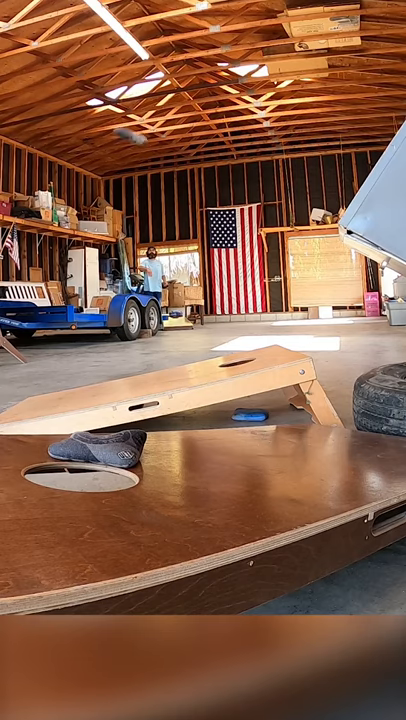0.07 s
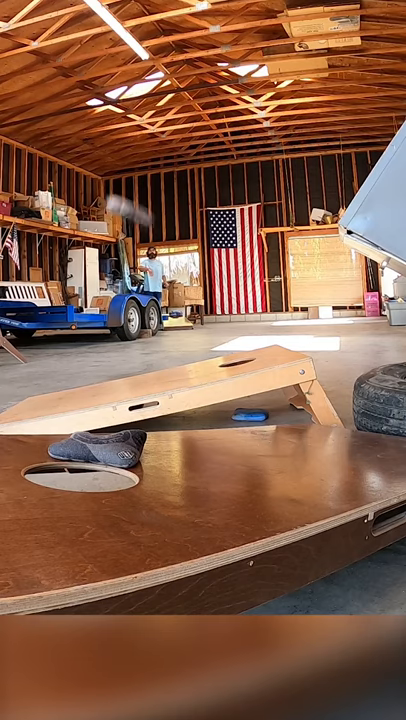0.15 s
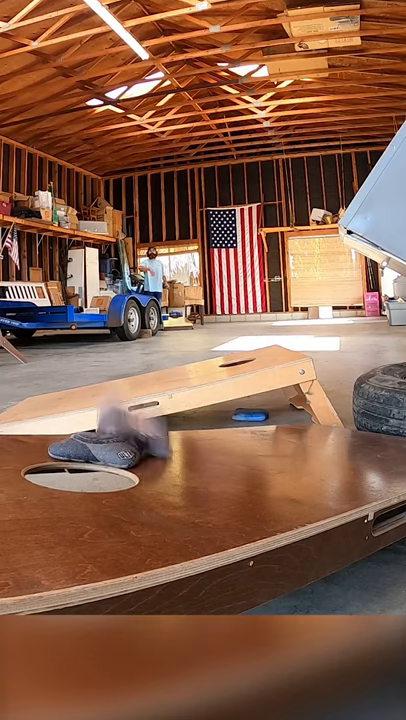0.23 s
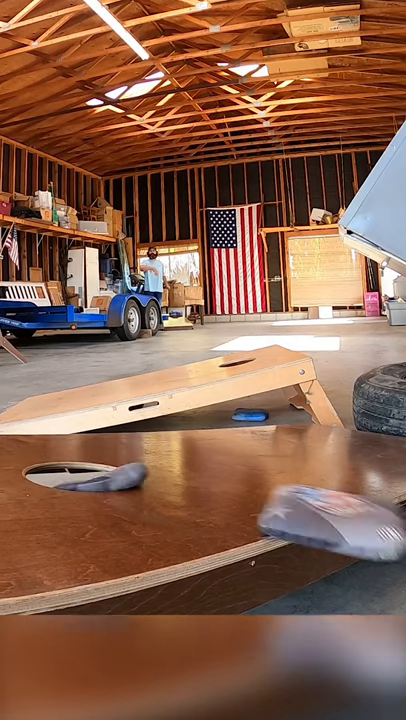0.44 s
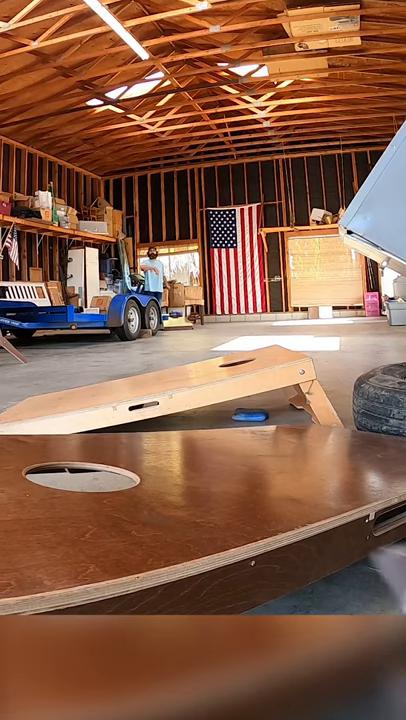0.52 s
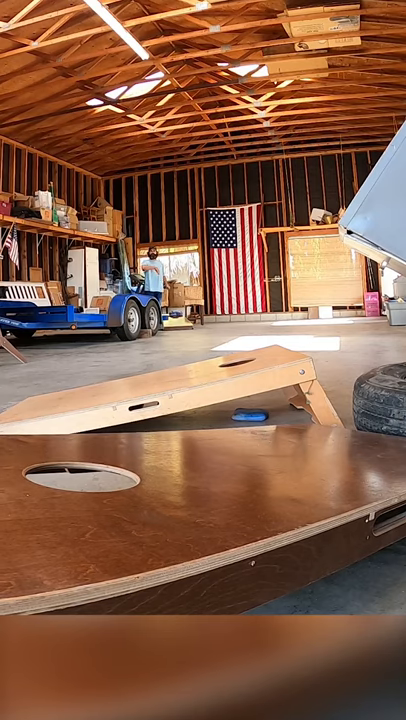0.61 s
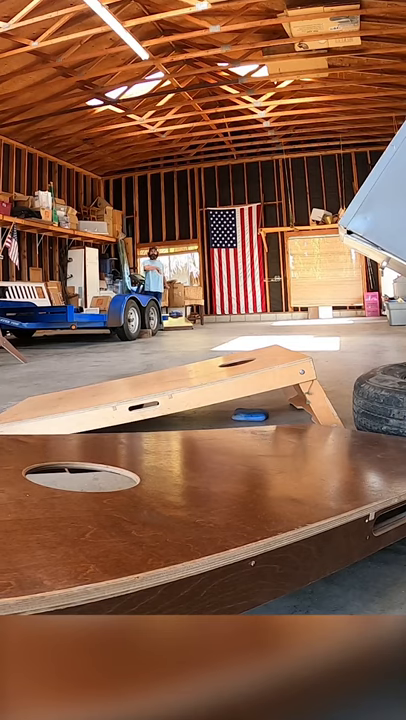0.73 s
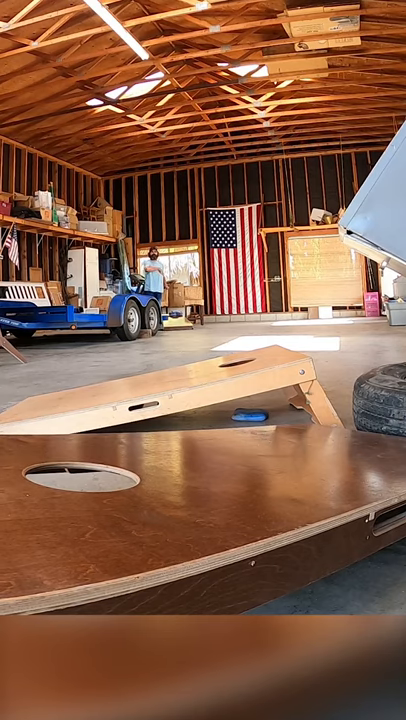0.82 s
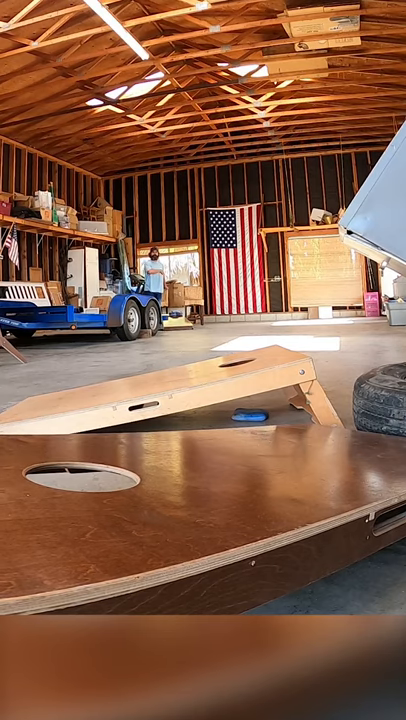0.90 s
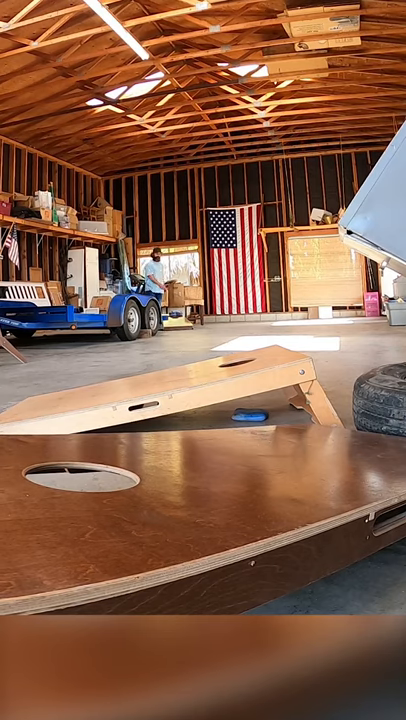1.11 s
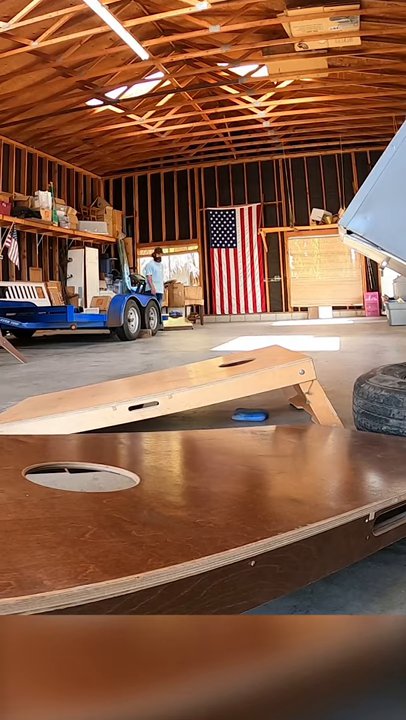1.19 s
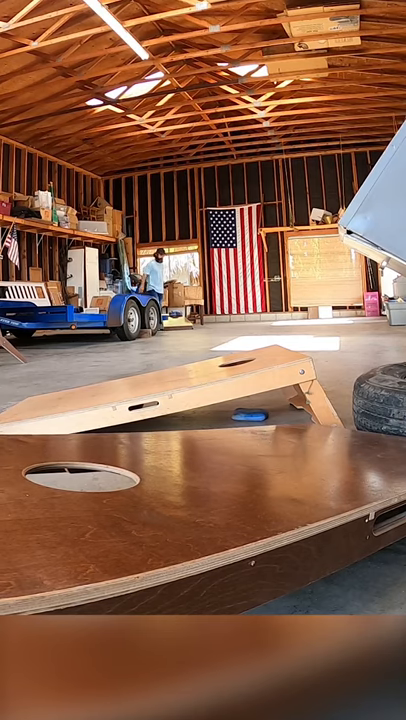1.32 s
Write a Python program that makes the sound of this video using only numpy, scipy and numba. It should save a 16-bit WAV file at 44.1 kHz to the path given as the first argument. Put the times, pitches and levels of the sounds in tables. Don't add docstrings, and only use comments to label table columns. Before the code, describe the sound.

A pellet-filled bag slaps a hollow plywood board right beside the microphone; the frame bounces and shudders, cloth scrapes along the varnish, then lighter bag drops knock at right. Large garage echo, faint bird and distant road.

```python
import sys
import numpy as np
from scipy import signal
from scipy.fft import rfft, irfft
from scipy.io import wavfile
from scipy.ndimage import uniform_filter1d
from numba import njit

SR = 44100
rng = np.random.default_rng(int(sys.argv[2]) if len(sys.argv) > 2 else 0)


def boost(x):
    u = np.asarray(x, float) / 20
    return 10 ** u


def transcribe(signal):
    frames = np.atleast_2d(signal).T
    limited = np.clip(frames, -1, 1)
    pcm = np.round(limited * 32767).astype(np.int16)
    wavfile.write(sys.argv[1], SR, pcm)


N = 59535
T = np.arange(N) / SR


def level(x, db):
    return x * boost(db) / np.sqrt(np.mean(x ** 2))


def on_log(hz, table):
    a = np.array(table, float)
    return np.interp(np.log(np.maximum(hz, 1)), np.log(a[:, 0]), a[:, 1])


def colour(x, table):
    log_gain = on_log(np.fft.rfftfreq(4096, 1 / SR), table) * np.log(10) / 20
    cepstrum = irfft(log_gain)
    cepstrum[1:2048] *= 2
    cepstrum[2049:] = 0
    impulse = irfft(np.exp(rfft(cepstrum)))
    return signal.fftconvolve(x, impulse[None], axes=1)[:, :N]


def ring(x, hz, t60):
    pole = np.exp((2j * np.pi * hz - np.log(1000) / t60) / SR)
    return signal.lfilter([1], [1, -pole], x).imag


def push(start, ms):
    u = np.clip((T - start) * 1000 / ms, 0, 1)
    force = np.sin(np.pi * u) ** 2
    return force / (force.sum() + 1e-9)


def high_pass(x, hz, order=1):
    return signal.lfilter(*signal.butter(order, hz, "high", fs=SR), x)


def pair(mid, side):
    s = high_pass(side, 2500)
    return np.array([mid + s, mid - s])


def walk(rate):
    k = int(SR / rate)
    steps = np.repeat(rng.standard_normal(N // k + 1), k)
    return 0.85 * uniform_filter1d(uniform_filter1d(steps, k), k)[:N]


def grains(rate, scatter_db):
    u = rng.random((3, N))
    size = boost(-scatter_db * np.log(1 - u[2]))
    return level((u[0] < rate / SR) * np.sign(u[1] - .5) * size, 0)


def struck(hits, modes, shake):
    chance = rng.standard_normal((len(hits), len(modes)))
    forces = [boost(db) * push(start, ms) for start, db, ms in hits]
    out = 0
    for k, (hz, db, t60) in enumerate(modes):
        sign = -1 if hz > 450 and k % 2 else 1
        force = shake[k] + boost(3.1 * chance[:, k]) @ forces
        out = out + sign * boost(db - 7) * ring(force, hz, t60)
    return out


# start in seconds, level in dB, contact in ms.
BLOWS = [
    (0.237, -34, 0.65),
    (0.2469, -21.5, 1.1),
    (0.2501, 2.5, 2.47),
    (0.256, -0.5, 0.27),
    (.264, 0.5, 4.1),
    (0.285, 1, 1.6),
]
# frequency in Hz, level in dB, t60 in seconds.
FACE_MODES = [(55.8, -23.5, 0.055), (88, -11.5, .1), (136.1, -2.5, 0.07), (164, -0.5, 0.049),
              (188.5, -13.5, 0.058), (400, -12.5, 0.089), (500, -21, 0.027), (916.6, 0.5, 0.041),
              (1110, -6.5, 0.05)]


def face():
    return struck(BLOWS, FACE_MODES, np.zeros(len(FACE_MODES)))


# start in seconds, level in dB, contact in ms.
BOUNCES = [
    (.2995, -6.5, 0.2),
    (.3015, -5, .4),
    (.3045, 3, 1),
    (.312, -7.5, 4.5),
    (.327, -13, 3.9),
    (.365, -32.5, 1.9),
    (.39, -8.5, 3),
]
# frequency in Hz, level in dB, t60 in seconds.
FRAME_MODES = [(60, -11.5, 0.11), (151.4, 0, 0.16), (253, 2, 0.1), (343.4, -3, 0.064), (394, -3.5, .1),
               (498.6, -4, .07), (526, -8, 0.072), (614, -10, 0.03), (683.7, -13, 0.23), (810, -7.5, 0.037),
               (1000, -2.5, 0.015), (1210, -6.5, 0.016), (1580, -8, 0.026), (1950, -22.5, 0.018)]


def frame():
    start_s, start_db, t60_s = .31, -33.5, 0.53
    fade = (T > start_s) * boost(start_db - 60 * (T - start_s) / t60_s)
    shudder = rng.standard_normal((len(FRAME_MODES), N)) * fade
    return struck(BOUNCES, FRAME_MODES, shudder)


def board():
    return high_pass(face() + frame(), 55, order=2)


# peak in seconds, level in dB, rise in ms, fall in ms, centre frequency in Hz.
SLAPS = [(.228, -42, .7, 6.1, 2800), (0.2396, -28.5, 0.62, 3.5, 2800), (.249, -8, 1.68, 4.2, 2500),
         (0.259, -11, 2.4, 4.5, 2500), (0.3025, -12, 1.3, 2, 1300), (.380, -33, 3, 10, 5840),
         (0.599, -22.5, 8.6, 14.5, 3300), (0.6772, -23.5, 0.2, 1.33, 1620), (.681, -18.5, 1.53, 6.7, 3730),
         (0.697, -32, 2.2, 13.3, 1580), (0.725, -36.5, 5, 7.9, 1300), (.801, -38, 2, 11, 856)]
# frequency in Hz, level in dB per Hz.
PELLET_COLOUR = [(180, -37), (300, -2.5), (656, -12.5), (946, -7.5), (1840, -15), (2440, -15),
                 (10600, -30.5), (16000, -34.5)]


def pellets():
    rattle = level(colour(pair(grains(16000, 1.5), .3 * grains(14000, 1.8)), PELLET_COLOUR), 0)
    out = 0
    for peak, db, rise, fall, hz in SLAPS:
        focus = rattle + boost(9.5) * signal.lfilter(*signal.iirpeak(hz, 0.7, fs=SR), rattle)
        focus = signal.lfilter(*signal.butter(2, min(4.1 * hz, 19000), fs=SR), focus)
        rising = ((peak - T) * 600 / rise) ** 2
        falling = (T - peak) * 1000 / fall
        out = out + boost(db - 8.5) * np.exp(-np.where(T < peak, rising, falling)) * focus
    return out


def crack():
    snap = boost(0.5) * ring(push(.2482, 0.23), 2500, .014)
    click = 1. * (np.arange(N) == int(.2639 * SR))
    return snap - boost(-11) * high_pass(click, 4000)


# start in
# seconds, level in dB, contact in ms, pitch in Hz, t60 in seconds.
KNOCKS = [(.2365, -25, 0.15, 890, 0.086), (.2575, -17, 0.25, 2030, 0.0068), (.266, -2.5, 2.8, 88, 0.21),
          (.2993, 0.5, 0.39, 1000, 0.018), (0.301, -17, 0.17, 1856, 0.026),
          (0.586, -30.5, 1.85, 600, 0.016), (0.596, -54, 0.32, 954, 0.071),
          (0.6773, -16, 0.39, 1400, 0.015), (0.676, -23, 6.1, 100, 0.07), (.680, -40, 1, 330, .03),
          (.799, -40, 0.82, 713, 0.14), (.803, -33, 2.1, 464, 0.11), (.808, -24.5, 3.6, 242, 0.21)]


def thuds():
    return sum(boost(db) * ring(push(start, ms), hz, t60) for start, db, ms, hz, t60 in KNOCKS)


# time in seconds, level in dB.
SLIDE = [
    (.235, -58),
    (.25, -29),
    (.275, -18.5),
    (.34, -23.5),
    (.44, -23),
    (.5, -33.5),
    (.57, -38),
    (.645, -50),
    (.75, -55.5),
]
# frequency in Hz, level in dB per Hz.
CLOTH_COLOUR = [(180, -38.5), (300, -8.5), (574, -10), (787, -13), (4090, -30.5), (12300, -56),
                (16000, -81)]


def slide():
    scrape = level(colour(pair(grains(20000, 0.45), .4 * grains(14000, 0.9)), CLOTH_COLOUR), 0)
    return scrape * boost(np.interp(T, *np.array(SLIDE).T) + .7 * walk(130))


# frequency in Hz, t60 in seconds.
ROOM_T60 = [(60, 1), (250, 0.89), (1000, .8), (4000, 0.83), (9000, 0.89), (15000, 0.15)]


def room(x):
    delay_s, tail_db = 0.0066, -12.5
    noise = rfft(pair(rng.standard_normal(N), rng.standard_normal(N)))
    hz, tail = np.fft.rfftfreq(N, 1 / SR), 0
    for centre in 40 * 2. ** np.arange(10):
        octave = np.abs(np.log2(hz / centre + 1e-9)) < .5
        tail = tail + irfft(noise * octave, N) * boost(-60 * T / on_log(centre, ROOM_T60))
    tail = tail * np.clip(T / delay_s - 1, 0, 1)
    tail = tail / np.sqrt((tail ** 2).sum(1).mean())
    return boost(tail_db) * signal.fftconvolve(x.mean(0)[None], tail, axes=1)[:, :N]


# start in seconds, length in seconds, pitch in Hz, level in dB, share of pitch lost in the fall.
CHIRPS = [
    (0.817, 0.04, 3640, -49.5, 0.046),
    (.870, 0.0206, 3830, -49, 0.068),
    (0.903, 0.025, 3750, -53.5, 0.017),
]


def bird():
    out = 0
    for start, length, hz, db, fall in CHIRPS:
        u = np.clip((T - start) / length, 0, 1)
        phase = 2 * np.pi * np.cumsum(hz * (1 - fall * u ** 2)) / SR
        out = out + boost(db + 3.6 * walk(400)) * np.sin(np.pi * u) * np.sin(phase)
    return out


# frequency in Hz, level in dB per Hz.
ROAD_COLOUR = [(15, -48), (25, -0.5), (115, -4.5), (219, -6.5), (488, -30), (1090, -10), (2130, -28),
               (6130, -55), (12000, -78), (15600, -100), (22000, -120)]


def road():
    noise = pair(rng.standard_normal(N), 1.8 * rng.standard_normal(N))
    spectrum = rfft(level(colour(noise, ROAD_COLOUR), -43))
    hz, swell, out = np.fft.rfftfreq(N, 1 / SR), walk(6.7), 0
    band = np.floor(2 * np.log2(np.maximum(hz, 20) / 20))
    for k in range(int(band.max()) + 1):
        out = out + irfft(spectrum * (band == k), N) * boost(.7 * swell + .8 * walk(14))
    return out


def scene():
    side = np.array([[.5], [-.5]])
    near = board() + pellets() + crack() + slide() + thuds()
    near = near * boost(side * -2.5 * (T > .65))
    far = bird()
    return near + room(near + 1.6 * far) + far + road() * boost(side * 2)


# frequency in Hz, left lead in radians.
PORT_PHASE = [(100, 0), (600, -0.32), (1500, -0.67), (3000, -0.96), (6000, -1.3), (11000, -0.24),
              (16000, -.4)]
# frequency in Hz, left minus right in dB.
PORT_DB = [(60, 1.1), (400, 0.25), (1300, 1.2), (2800, 3), (5000, 1.5), (9000, -0.5), (15000, -6.5)]


def ports(x):
    hz = np.fft.rfftfreq(N, 1 / SR)
    left = boost(on_log(hz, PORT_DB) / 2) * np.exp(.5j * on_log(hz, PORT_PHASE))
    return irfft(rfft(x) * np.array([left, 1 / left]), N)


@njit
def follow(x, up, down):
    e, y = 0., np.empty(len(x))
    for i in range(len(x)):
        e += (x[i] - e) * (up if x[i] > e else down)
        y[i] = e
    return y


def auto_gain(x):
    threshold_db, ratio, attack_s, release_s = -41.5, 1.2824, 0.053, 1.1
    envelope = follow(np.abs(x).mean(0), 1 / (attack_s * SR), 1 / (release_s * SR))
    return x * np.minimum(boost(threshold_db) / (envelope + 1e-9), 1) ** (1 - 1 / ratio)


def roll_off(x):
    return signal.sosfilt(signal.butter(12, 16440, fs=SR, output="sos"), x)


def record(dry):
    x = auto_gain(ports(dry))
    mix = signal.sosfilt(signal.ellip(8, .2, 70, 15800, fs=SR, output="sos"), x)
    return roll_off(mix)


dry = scene()
out = record(dry)
transcribe(out)
```